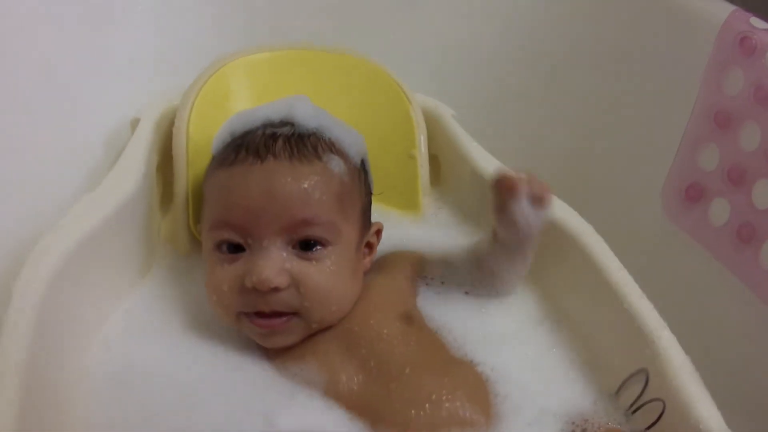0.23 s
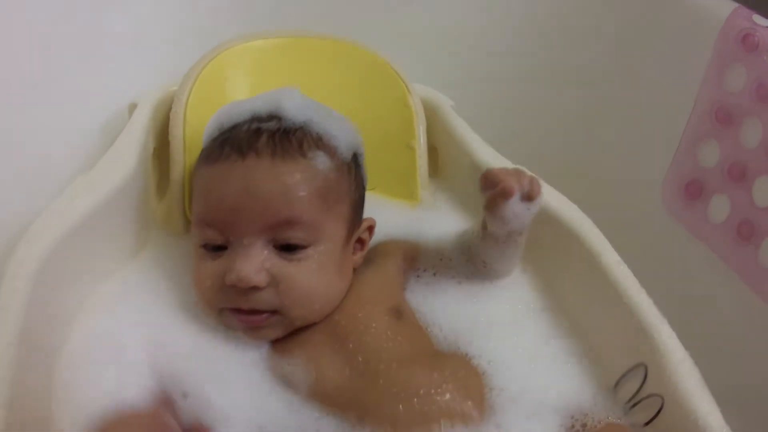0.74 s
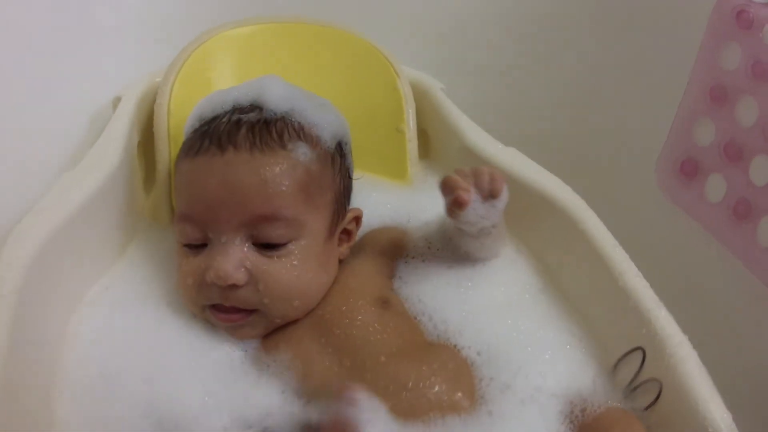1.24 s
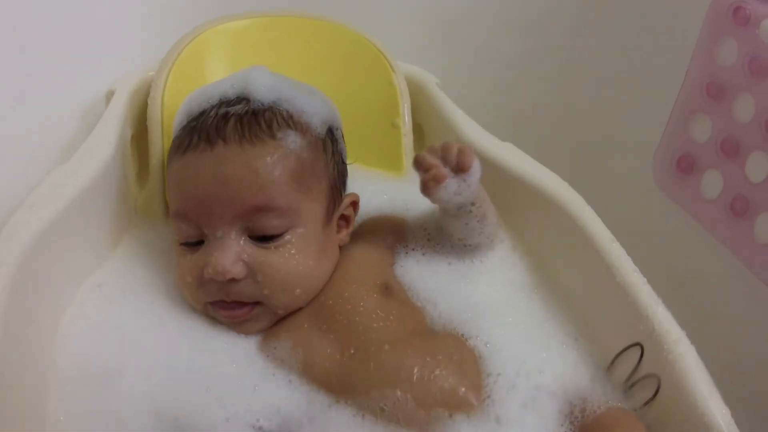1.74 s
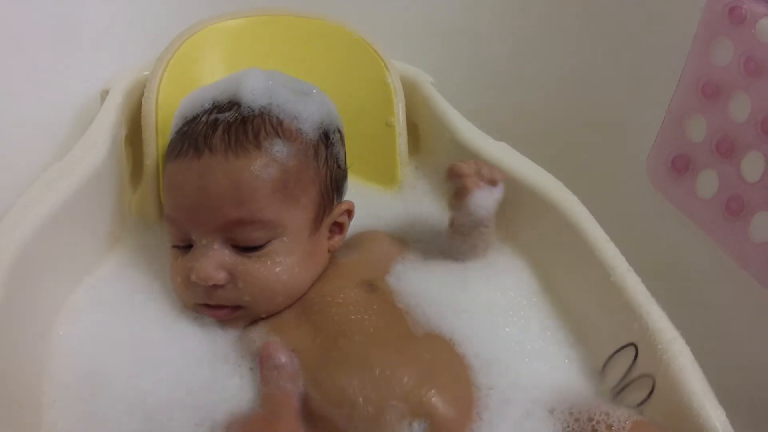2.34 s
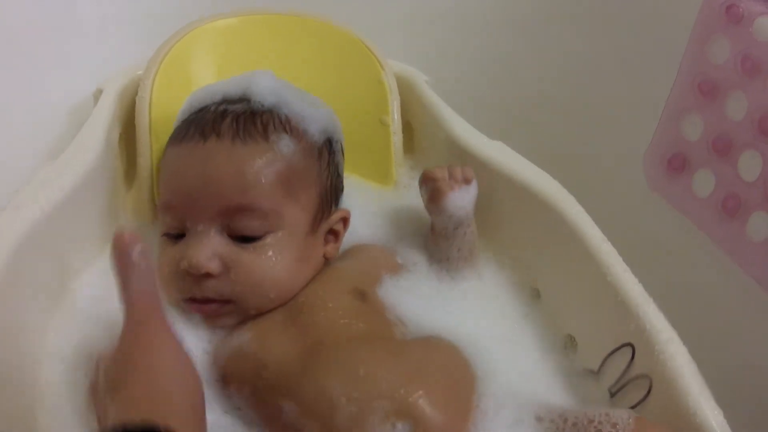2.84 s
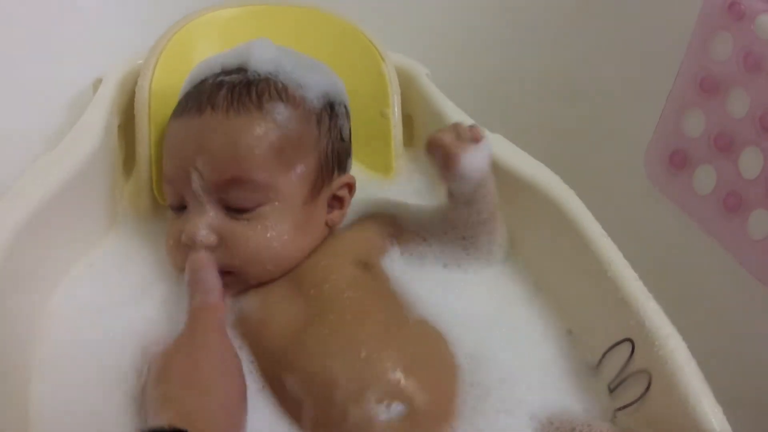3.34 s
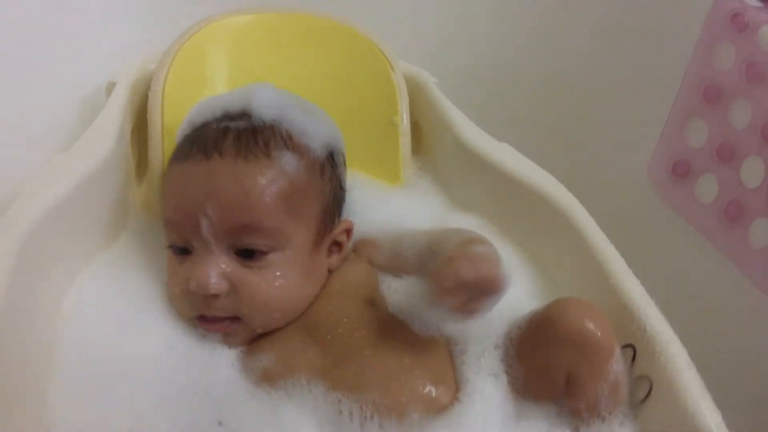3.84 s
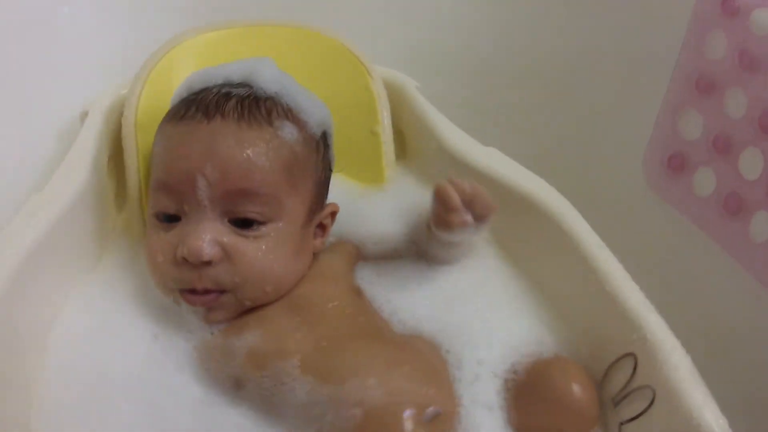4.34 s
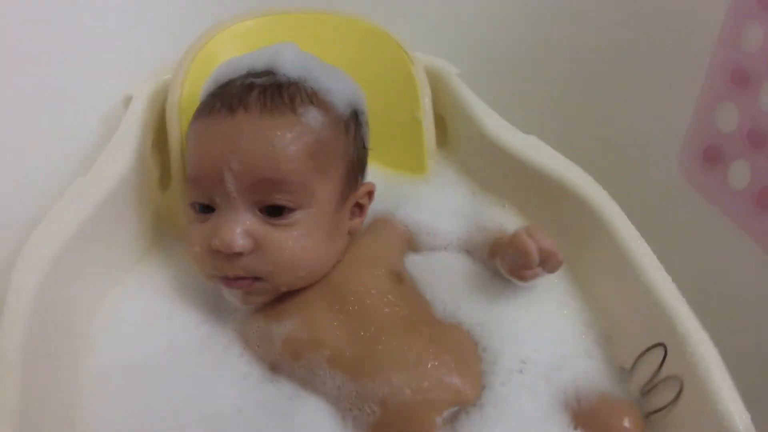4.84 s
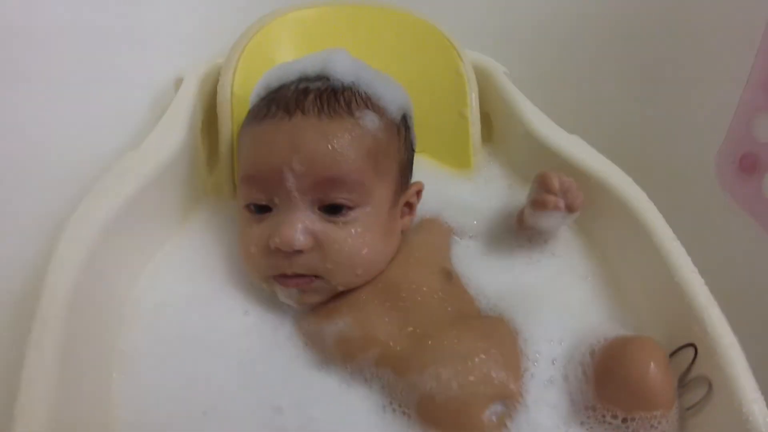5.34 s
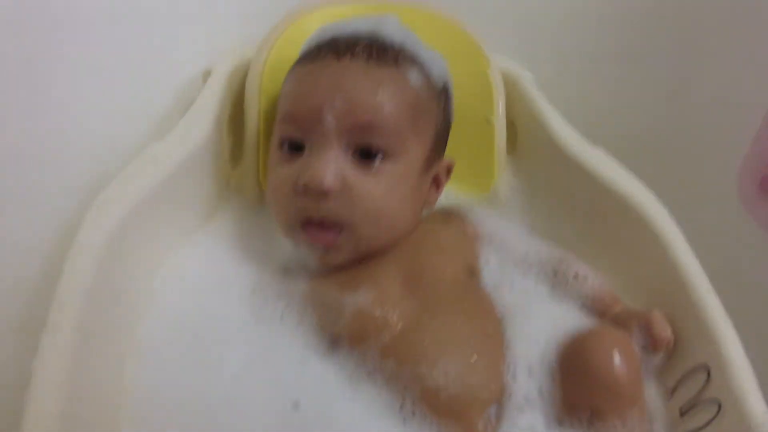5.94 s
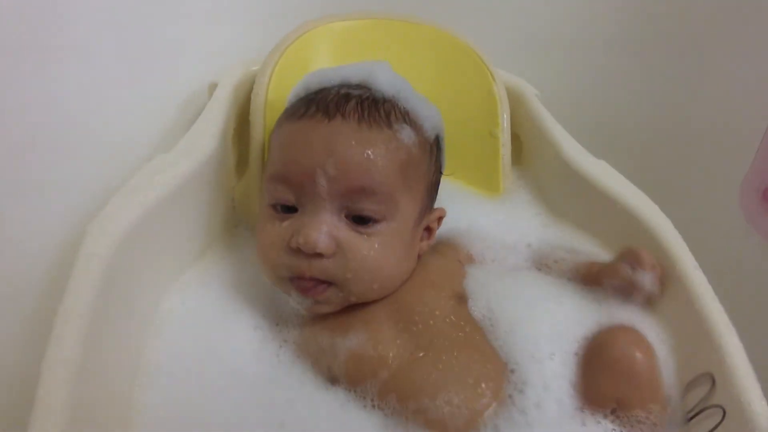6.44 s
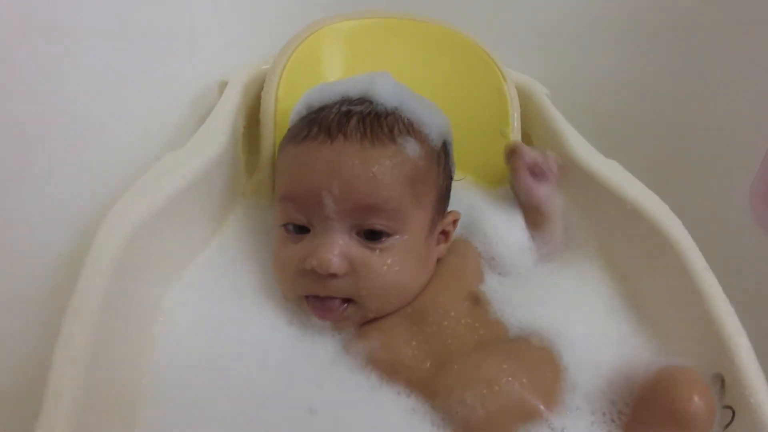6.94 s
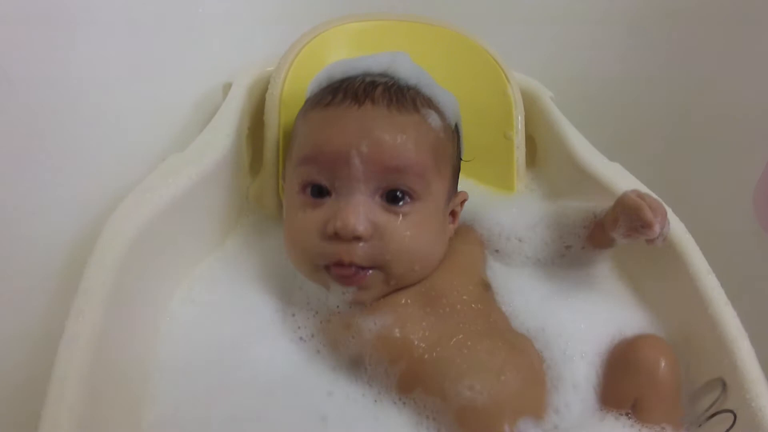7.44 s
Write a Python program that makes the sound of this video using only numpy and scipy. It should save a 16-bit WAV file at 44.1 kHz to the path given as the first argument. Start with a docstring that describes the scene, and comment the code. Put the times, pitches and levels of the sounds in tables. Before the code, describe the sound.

Dry plasticky crackles and clicks over a faint steady hiss, thickening into busy creaking, with soft low bumps and one sharp hollow knock.

```python
"""Dry crackles over a steady hiss are heard first; low bumps, a hollow knock and faint bubbles join them.
The scene is a hand-held camera over a foamy plastic tub. Clicks are impulses that excite narrow resonances,
probably of the camera housing, which creaks in the hand; the hiss is noise shaped by the same resonances.
Bumps are single-cycle pushes, the knock and bubbles are decaying sines, the splutter and low bed are noise.
Slow sampling with each value held mirrors the sound into the treble."""
import sys
import numpy as np
from scipy import signal
from scipy.fft import rfft, irfft
from scipy.io import wavfile
from scipy.ndimage import uniform_filter1d

SR = 44100
rng = np.random.default_rng(int(sys.argv[2]) if len(sys.argv) > 2 else 0)


def store_pcm(level_fs):
    """Save levels as 16-bit WAV."""
    pcm = np.round(np.clip(level_fs, -1, 1) * 32767).astype(np.int16)
    wavfile.write(sys.argv[1], SR, np.atleast_2d(pcm).T)


N = 338688

# Clear crackles: t/s, level/dB of the main ring, then low, middle and high ring levels/dB relative to it
CRACKLES = [(0.06, -31, -8.5, -13, -4), (0.0772, -42, -15, -15, -19), (0.144, -28, -17, -20, -10),
            (0.175, -36, -17, -14, -1), (0.2007, -25.5, -14, -10, -20), (0.2957, -38, -24, -21, -23),
            (0.3503, -44, 4, 15, -8), (0.3599, -37, -14, -1, -4), (0.4672, -32.5, -33, -20, -25),
            (0.6032, -36.5, -21, -21, -3), (0.6605, -32, -22, -16, -16), (0.6718, -34, -24, -18, -14),
            (0.7147, -40, -18, -14, -7), (0.7302, -29, -16, -6, -7), (0.7423, -21, -11, -4.5, -5),
            (0.7454, -33, -8, -5, -13), (0.7576, -41, -11, 5, -15), (0.798, -37, -11, 0, -1.5),
            (0.9014, -35.5, -13, -7, -4), (0.9335, -36.5, -18, -14, -12), (1.069, -27, -17, -26, -11),
            (1.0868, -35.5, -11.5, -5, -1), (1.1414, -25, -13.5, -26, -8.5), (1.1884, -33.5, -19, -21, -19),
            (1.2898, -27, -11.5, -11, -22), (1.3294, -37, -12, -15, -16), (1.3572, -24, -15, -16, -17),
            (1.3679, -21, -14.5, -8, -5), (1.4483, -37.5, -12, -10, 0.5), (1.4927, -37.5, -7, -15, -12),
            (1.5713, -32.5, -24, -17, -23), (1.5998, -38.5, -9, -1, -5), (1.7076, -26.5, -25, -24, -25),
            (1.7632, -40, -3, -8, -10), (1.7831, -34.5, -5, -8, -12), (1.7986, -37, -4.5, -16, 4.5),
            (1.9087, -46, -6, 4, -12), (1.9418, -36.5, -8, -1, -4), (2.0144, -38.5, -11, -6, -13),
            (2.0627, -41, -10, -1, -3), (2.1977, -34.5, -16, -17, -19), (2.2888, -40, -2.5, -5, -17),
            (2.3247, -39, -11, -13, -8), (2.3543, -42.5, -7, -10, -16), (2.4347, -50.5, 8, -3, -3),
            (2.464, -31, -11.5, -6, -7), (2.5924, -40.5, -21, -12, -14), (2.687, -40.5, -16, 5, -18),
            (2.9119, -29, -16, -10, -14), (2.9197, -36, -8, -4, -18), (2.9294, -32.5, -14, -15, -11),
            (2.9562, -39, -24, -18, -1), (3.0659, -38.5, -23, -16, -16), (3.095, -36, -19, -15, -12),
            (3.1682, -28, -20, -21, -16), (3.3228, -37.5, -13, -8, 1), (3.4047, -40, -23, -17, -13),
            (3.4347, -38, -19, -21, -15), (3.5011, -31.5, -11, -18, -6), (3.5478, -39, -15, -13, -5),
            (3.5924, -24, -25, -24, -39), (3.6478, -40, -17, -15, -17), (3.872, -35, -9, -8, -5),
            (4.0086, -37, -15, -14, -3), (4.0359, -30.5, -10, -5, -4.5), (4.164, -30, -15, -16, -19),
            (4.1869, -23, -12, -13, -25), (4.1902, -29, -11, -8, -26), (4.363, -37.5, -4, -16, 1),
            (4.3986, -31, -10, -10, -12), (4.4383, -30.5, -7, 1, -13), (4.4686, -34.5, -7, -5, -2),
            (4.4982, -33, -9, 0, -1), (4.583, -47, -7, 12, -15), (4.6107, -30.5, -8, -19, -6),
            (4.6828, -34, -15, -7, -15), (4.7224, -36.5, -10, -2, -18), (4.7654, -35.5, -5, 3, -4),
            (4.779, -28.5, -19, -14, -3), (4.8242, -30, -15, -21, -8), (4.8717, -30, -12, -2, -2),
            (4.9059, -39, -4, 4, -9), (5.0384, -27.5, -8, -1.5, -10), (5.1242, -39.5, -18, 10, -16),
            (5.1466, -33.5, -7, -4, -7), (5.1744, -30, -16, 3, -2), (5.1982, -41, -8, -17, -10),
            (5.2771, -20, -7.5, -14, -12), (5.2913, -25, -24, -9, -18), (5.337, -37.5, -0.5, -12, -14),
            (5.3992, -32, -12, -11, -15), (5.4162, -36, -5, 3, -2), (5.4254, -31.5, -2, 2, -2),
            (5.4709, -34, -8, -10, -3), (5.4948, -31.5, -12, 3.5, -5), (5.504, -35, -13, 2, -12),
            (5.5652, -23.5, -11, -3, -5), (5.5684, -30, -15, -5.5, 3), (5.5816, -27, -6, 1, -16),
            (5.6, -26.5, -11, -16, -8), (5.6071, -29.5, -9, -15, -13), (5.6208, -35, -19, -16, -17),
            (5.6269, -30.5, -20, -15, -25), (5.6875, -36, -5, 4, 4), (5.7173, -29, -18, -16, -17),
            (5.7298, -29.5, -5, -18, -26), (5.7347, -18, -9, -19, -35), (5.7472, -31, -17, -9, -14),
            (5.7534, -27, -18, -17, -18), (5.763, -27.5, -17, -17, -15), (5.7836, -23, -15, -18, -4),
            (5.7978, -28, -20, -16, 2.5), (5.816, -34, -12, -13, -20), (5.8348, -24.5, -19, -8, -4.5),
            (5.8424, -31, -7, 2, -22), (5.8635, -38, -14, -5, -11), (5.8892, -36, 1, 7, -11),
            (5.9254, -25.5, -24, -3, -16), (5.9382, -16.5, -10.5, -7.5, -12), (5.9424, -26, -15, -17, -18),
            (6.002, -25.5, -15, -16, -18), (6.0164, -35, -10, -10, -18), (6.0162, -24, -10, -20, -14),
            (6.0377, -36, -13, -13, -24), (6.0523, -38, -3, 0, -12), (6.0717, -32.5, -1.5, 8.5, -19),
            (6.098, -36, -18, -11, -15), (6.1337, -34.5, -15, -16, -14), (6.1534, -33, -12, -9, -14),
            (6.1664, -29, -6.5, -2, -8), (6.2006, -29.5, -19, -9, -9), (6.2558, -30, -6, 4.5, -22),
            (6.2763, -26, -8.5, -5.5, -11), (6.2922, -26.5, -11, -12, -5), (6.317, -25, -21, -18, -19),
            (6.3853, -21.5, -9, -11, -18), (6.3935, -22.5, -11, -17, -5), (6.4155, -27.5, -14, -10, -11),
            (6.4263, -22.5, -11.5, -12, -24), (6.4784, -28.5, -5.5, -15, -3), (6.4855, -28, -5, -20, -11),
            (6.5, -27.5, -15, -14, -15), (6.529, -39, -7, 1, 8.5), (6.5404, -29, -17, -15, -16),
            (6.549, -31, -14, -9, -13), (6.5604, -27, -11, -12, -11), (6.568, -25, -8.5, -9, -11),
            (6.6093, -31.5, -4.5, -14, -18), (6.6269, -28, -23, -11, -19), (6.6617, -28, -21, -13, -23),
            (6.6729, -19, -8, -22, -24), (6.6947, -22, -10.5, -20, -7), (6.7376, -25.5, -17, -17, -22),
            (6.7458, -34, -13, -14, -10), (6.7838, -29, -9.5, -16, -16), (6.824, -31, -4, -3, -15),
            (6.878, -30.5, -10, -10, -5), (6.8888, -31, -21, -12, -6), (6.9154, -29.5, -9.5, -7, -13),
            (6.948, -26.5, -7.5, -17, -11), (6.973, -41, -20, -13, -18), (7.0218, -23.5, -9.5, -10, -26),
            (7.0647, -20.5, -15.5, -14, -12), (7.0861, -21.5, -14, -8, -9), (7.099, -28.5, -20, -4, -15),
            (7.1331, -34, -14, 1, -2), (7.1523, -31.5, -10, -17, 0), (7.1616, -30, -21, -17, -11),
            (7.1801, -32.5, -4.5, -6, -3), (7.206, -20.5, -12.5, -13, -23), (7.2571, -33, -19, -17, -9),
            (7.275, -23, -18, -20, -4), (7.2824, -27, -19, -5, -1), (7.3098, -21, -9.5, -2, -3),
            (7.3137, -24.5, -12, -7, -12), (7.3379, -28.5, -8, -18, -20), (7.3927, -32.5, -18, -14, -11),
            (7.4084, -27.5, -10, -13, -6), (7.43, -30.5, -9, -6, -6), (7.4629, -23, -20, -16, -7),
            (7.5187, -20, -14, -20, -1), (7.5436, -40, -17, -12, -15), (7.5602, -41, -12, -2, -13),
            (7.581, -38, -2, 3, -14), (7.6041, -24, -13, -8, -23), (7.6337, -30, -3, 0, -13),
            (7.6438, -19.5, -12, -10, -21), (7.655, -32, -16, -15, -9), (7.6688, -28, -4, -1, -1)]
# Resonances that colour a click: f/Hz, relative level/dB
HOUSING = [(210, -37), (350, -11), (536, -16), (755, -6.5), (945, -15), (1150, -7.5), (1320, -12.5),
           (1710, -6), (2140, -5), (2520, 1), (2870, -12), (3350, -10.5), (3770, -5), (4340, -16.5),
           (5900, -17), (7670, -95), (13000, -120)]
# Click excitation, weaker at both ends: f/Hz, gain/dB
CLICK_TILT = [(350, -3.5), (650, 0), (4100, -3.5), (4700, -6), (6000, -7.5)]
# Borders between the low, middle, main and high rings: f/Hz
RING_BORDERS = [1357, 2060, 3266]
# How busy the handling is, as fine crackle: t/s, level/dB
STIR = [(0.0, -50), (0.7, -51.5), (0.9, -55), (1.41, -55), (2.27, -57), (2.8, -55), (3.23, -56),
        (3.74, -52), (4.36, -52), (4.6, -47.5), (5.13, -48.5), (5.73, -45.5), (6.69, -47.5), (7.12, -45),
        (7.36, -50), (7.68, -48)]
# Mean strength of the low, middle, main and high rings of a middling click: relative level/dB
SCATTER_RINGS = [-10.5, -9.5, -2.5, -7.5]
# Bumps of the hand or of water against the tub: t/s, level/dB, f/Hz, push direction (-1 or 1),
# level/dB of the heave with it
BUMPS = [(0.3626, -42.5, 86, 1, -70), (0.8935, -39, 112, 1, -66), (1.318, -46, 150, 1, -64),
         (1.846, -37.5, 140, -1, -57), (2.1948, -43.5, 131, 1, -62), (2.2693, -41.5, 111, -1, -72),
         (2.976, -59, 60, 1, -68), (3.988, -32.5, 127, 1, -72), (4.226, -34, 148, -1, -59),
         (4.3574, -39.5, 172, 1, -57), (4.7774, -44, 120, -1, -68), (5.112, -41, 55.5, -1, -64),
         (5.7537, -35.5, 230, 1, -53), (5.7744, -39, 230, 1, -70), (5.7985, -37.5, 230, -1, -70),
         (5.8902, -41, 131, 1, -57), (6.275, -35, 235, -1, -72), (7.023, -46, 139, -1, -66)]
# A sharp, hollow knock and its two bounces: t/s, level/dB before the modes
KNOCK = [(4.9672, -8.5), (4.9706, -15), (4.974, -19.5)]
# Modes of the knock: f/Hz, relative level/dB, t60/s
KNOCK_MODES = [(950, -16, 0.014), (1370, 4.5, 0.0041), (2110, 2.5, 0.0046)]
# Faint bubbles: t/s, level/dB before onset and decay, starting f/Hz
BUBBLES = [(2.915, -48, 760), (3.215, -51, 1120), (3.495, -50, 1560), (3.64, -50, 1580), (6.052, -43, 940)]
# Slow heaving of the hand: t/s, level/dB
HEAVE = [(0.0, -71), (0.85, -74), (2.41, -73), (2.82, -75), (4.49, -68), (4.88, -51), (5.45, -69),
         (5.88, -62), (6.33, -70), (6.76, -68), (7.31, -70), (7.68, -59)]
# Spectrum of the hand motion: f/Hz, relative level/dB
SWAY = [(12, -33), (25, -9), (45, 1.5), (70, -11.5), (150, -60)]
# Spectrum of the rumble: f/Hz, relative level/dB
RUMBLE = [(26, -31), (45, -0.5), (199, -1), (550, -10.5), (720, -32), (1210, -120)]
# Tilt of the hiss on top of the housing colour: f/Hz, relative level/dB
HISS = [(400, -12.5), (1000, -8), (2500, 6), (4000, 1), (5000, 7), (6000, 2.5)]
# Spectrum of the faint bass that differs left and right: f/Hz, relative level/dB
APART = [(18, -22), (30, 0), (80, -11), (256, -8), (1100, -31.5), (1340, -37), (1500, -35), (1950, -58),
         (3300, -120)]
# Treble roll-off: f/Hz, gain/dB
TOP = [(15000, -1), (15400, -14), (15800, -12), (16100, -26), (16500, -32)]

TRAIL_DB, TRAIL_T60_S = -20.0, 0.045  # extra fine crackle after a clear one, relative to its level
SCATTER_PER_S, SCATTER_DB, SCATTER_SPREAD_DB = 25, 7, 3.5  # rate, level above the stir, spread either way
SCATTER_COLOUR_DB = 4.5  # standard deviation of each ring of a middling click
THUD_DB, THUD_HZ = -8, 270  # nudge under every clear crackle, relative to its low ring
FIZZ_S, FIZZ_DB, FIZZ_HZ, FIZZ_WIDTH_HZ, FIZZ_T60_S = 1.772, -41.5, 4143, 900, 0.14
BUBBLE_T60_S, BUBBLE_RISE_PER_S = 0.096, 3.0  # pitch gained as a share of the starting pitch per second
JOLT_S = 0.036  # half length, to 1/e, of the heave that comes with a bump
RUMBLE_DB, RUMBLE_FOLLOWS, CALM_DB = -61.5, 0.23, -57  # level when calm, dB per dB of stir above calm
HISS_DB, APART_DB = -59, -81
HELD_RATE_HZ, HOLD, EDGE_HZ = 12000, 4, 16550  # slow rate, repeats of each value, band limit


def gain_of(db):
    """Definition of level: 20 dB is a tenfold amplitude."""
    return 10 ** (np.asarray(db) / 20)


def evened(x):
    """Normalisation to unit root-mean-square amplitude."""
    return x / np.sqrt(np.mean(x ** 2) + 1e-20)


def read(points, hz):
    """Linear interpolation of level on a logarithmic frequency axis."""
    f, value = np.transpose(points)
    return np.interp(np.log(hz + 1), np.log(f + 1), value)


def along(curve):
    """Linear interpolation in time, at every sample."""
    return np.interp(np.arange(N) / SR, *np.transpose(curve))


def noise():
    """White noise: equal mean power at all frequencies."""
    return rng.standard_normal(N)


def coloured(x, points):
    """Linear filtering: a product of spectra."""
    return irfft(rfft(x) * gain_of(read(points, np.fft.rfftfreq(N, 1 / SR))), N)


def uneven(spread_db, width):
    """Amplitude modulation by smoothed noise; width is in samples."""
    return gain_of(spread_db * evened(uniform_filter1d(noise(), width)))


def causal(db):
    """Minimum phase: the gain at every frequency fixes a ring that starts at once."""
    log_gain = np.log(gain_of(np.maximum(db, -100)))
    mirrored = np.r_[log_gain, log_gain[-2:0:-1]]
    phase = -signal.hilbert(mirrored).imag[:len(db)]
    return irfft(np.exp(log_gain + 1j * phase))[:2048]


def rings(slope=9.8):
    """Impulse response of the housing, split by frequency into four parts whose envelopes peak at 1."""
    hz = np.fft.rfftfreq(8192, 1 / SR) + 1
    lowpasses = [1 / (1 + (hz / border) ** slope) for border in RING_BORDERS]
    shares = np.diff([0 * hz] + lowpasses + [0 * hz + 1], axis=0)
    colour_db = read(HOUSING, hz) + read(CLICK_TILT, hz)
    parts = [causal(colour_db + 20 * np.log10(share + 1e-9)) for share in shares]
    return [part / abs(signal.hilbert(part)).max() for part in parts]


def strike(s, db, spread_s, after, count=4):
    """Convolution of impulses with resonances: a click and weaker after-slips; db is events x 4 rings."""
    late, size, side = np.moveaxis(rng.random((len(s), 3, 4, count)), 1, 0)
    first = np.arange(count) == 0
    delay_s = late * np.where(first, 0.0003, spread_s)
    at = ((s[:, None, None] + delay_s) * SR).astype(int).clip(0, N - 1)
    force = np.where(first, 1, after * size * (1 - late))
    force = force * np.sign(side - 0.5) * gain_of(db)[:, :, None]
    trains = [np.bincount(at[:, k].ravel(), force[:, k].ravel(), N) for k in range(4)]
    return sum(signal.oaconvolve(train, ring)[:N] for train, ring in zip(trains, rings()))


def crackles():
    """Impulsive excitation: single clear clicks, each with its own balance of resonances."""
    s, db, low_db, middle_db, high_db = np.transpose(CRACKLES)
    ring_db = np.c_[db + low_db, db + middle_db, db, db + high_db]
    return strike(s, ring_db, spread_s=0.00501, after=0.74)


def scattered():
    """Random impulses: middling clicks whose level follows the stir."""
    luck, tint = rng.random((800, 3)), rng.standard_normal((800, 4))
    s = luck[:, 0] * N / SR
    silent = luck[:, 2] > SCATTER_PER_S * N / SR / len(s)  # thins the candidates to the wanted rate
    spread_db = SCATTER_SPREAD_DB * (2 * luck[:, 1] - 1)
    db = along(STIR)[(s * SR).astype(int)] + SCATTER_DB + spread_db - 200 * silent
    ring_db = db[:, None] + SCATTER_RINGS + SCATTER_COLOUR_DB * tint
    return strike(s, ring_db, spread_s=0.005, after=0.3)


def fine_crackle(per_s=600, spread_db=1.0, colour_db=4.0, drift_db=2.5):
    """Superposition of many tiny impulses, in loose clumps whose colour drifts."""
    luck = rng.random((12000, 3))
    drift = evened(uniform_filter1d(rng.standard_normal((N, 4)), 1000, axis=0))
    s = luck[:, 0] * N / SR
    silent = luck[:, 2] > per_s * N / SR / len(s)  # thins the candidates to the wanted rate
    size_db = spread_db * np.minimum(-np.log(luck[:, 1]), 2.2) - 200 * silent  # mostly small
    tint_db = colour_db * rng.standard_normal((len(s), 4)) + drift_db * drift[(s * SR).astype(int)]
    ring_db = size_db[:, None] + [-8.0, -4.5, -0.24, -6.0] + tint_db
    return evened(strike(s, ring_db, spread_s=0.0042, after=1.0) * uneven(2.0, 1500))


def busyness():
    """Exponential relaxation: fine crackle follows the stir, plus a dying trail after each clear crackle."""
    s, db = np.transpose(CRACKLES)[:2]
    kicks = np.bincount((s * SR).astype(int), gain_of(db + TRAIL_DB), N)
    decay = gain_of(-60 / (TRAIL_T60_S * SR))
    return gain_of(along(STIR)) + signal.lfilter([1], [1, -decay], kicks)


def bumps():
    """Pressure pulses of one cycle, without housing resonance, alone or under a clear crackle."""
    ways = rng.standard_normal(len(CRACKLES))  # only the sign is used
    thuds = [(s, db + low_db + THUD_DB, THUD_HZ, way)
             for (s, db, low_db, *_), way in zip(CRACKLES, ways)]
    out, t = np.zeros(N + 2000), np.arange(-1000, 1000) / SR
    for s, db, hz, way in [row[:-1] for row in BUMPS] + thuds:
        push = np.tanh(14 * hz * t) * np.exp(-(2.8 * hz * t - 0.15) ** 2)
        out[round(s * SR):][:len(t)] += np.sign(way) * gain_of(db) * push
    return out[len(t) // 2:][:N]  # centres each push on its time


def knock():
    """Modal decay: the same short hollow ring at every bounce."""
    out, t = np.zeros(N), np.arange(2000) / SR
    ring = sum(gain_of(db - 60 * t / t60) * np.sin(2 * np.pi * hz * t) for hz, db, t60 in KNOCK_MODES)
    onset = 1 - np.exp(-t / 0.00083)
    for s, db in KNOCK:
        out[round(s * SR):][:len(t)] += gain_of(db) * ring * onset
    return out


def fizz():
    """Band-limited noise with exponential decay: one short, bright, ragged splutter that starts at once."""
    t = np.arange(N) / SR - FIZZ_S
    edges_hz = [FIZZ_HZ - FIZZ_WIDTH_HZ / 2, FIZZ_HZ + FIZZ_WIDTH_HZ / 2]
    band = signal.butter(2, edges_hz, "band", fs=SR, output="sos")
    ragged = evened(signal.sosfilt(band, noise() * uneven(2.0, 80)))
    return ragged * gain_of(FIZZ_DB - 60 * abs(t) / FIZZ_T60_S) * (t > 0)


def bubbles():
    """Damped oscillation with rising frequency: short sines that climb as they die."""
    out, t = np.zeros(N), np.arange(4000) / SR
    onset = 1 - np.exp(-t / 0.0017)
    for s, db, hz in BUBBLES:
        note = np.sin(2 * np.pi * hz * (t + BUBBLE_RISE_PER_S * t ** 2 / 2)) * onset
        out[round(s * SR):][:len(t)] += gain_of(db - 60 * t / BUBBLE_T60_S) * note
    return out


def sway():
    """Low-frequency noise of the moving hand, amplitude-modulated to swell at every bump."""
    t = np.arange(N) / SR
    jolts = sum(gain_of(db) * np.exp(-((t - s) / JOLT_S) ** 2) for s, *_, db in BUMPS)
    return evened(coloured(noise(), SWAY)) * (gain_of(along(HEAVE)) + jolts)


def rumble():
    """Spectrally shaped noise, slightly uneven, whose level partly follows the stir."""
    level_db = RUMBLE_DB + RUMBLE_FOLLOWS * (along(STIR) - CALM_DB)
    return gain_of(level_db) * evened(coloured(noise(), RUMBLE) * uneven(1.32, 1500))


def hiss():
    """Stationary noise filtered by the housing resonances and a tilt."""
    return gain_of(HISS_DB) * evened(coloured(coloured(noise(), HOUSING), HISS))


def scene():
    """Linear superposition of all sources, the same in both channels."""
    clicks = crackles() + scattered() + busyness() * fine_crackle()
    single_events = bumps() + knock() + fizz() + bubbles()
    background = sway() + rumble() + hiss()
    return np.tile(clicks + single_events + background, (2, 1))


def record(dry):
    """Sample-and-hold imaging into the treble, a faint channel difference, then band limitation."""
    slow = signal.resample_poly(dry[0], HELD_RATE_HZ, SR)
    held = signal.resample_poly(np.repeat(slow, HOLD), SR, HOLD * HELD_RATE_HZ)[:N]
    apart = gain_of(APART_DB) * evened(coloured(noise(), APART))
    pair = coloured(held, TOP) + np.array([apart, -apart])
    band_limit = signal.firwin(511, EDGE_HZ, window=("kaiser", 9), fs=SR)
    return signal.oaconvolve(pair, band_limit[None], "same")


dry = scene()
out = record(dry)
store_pcm(out)
```